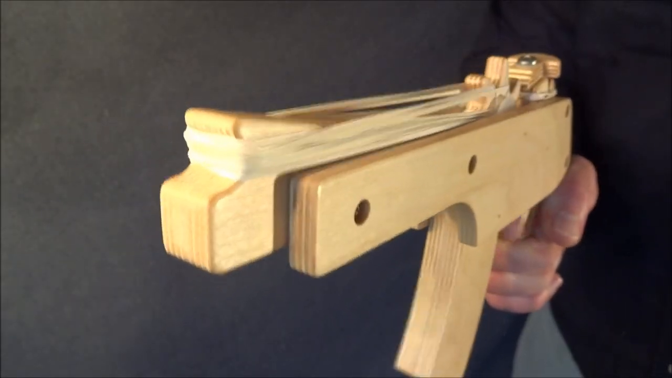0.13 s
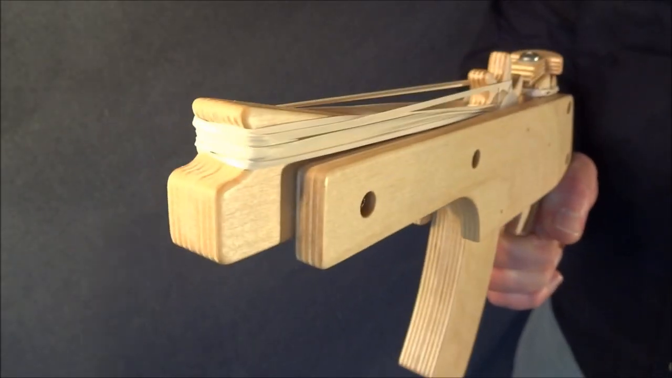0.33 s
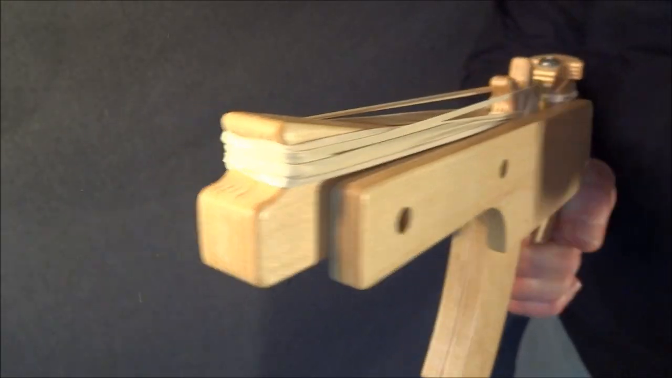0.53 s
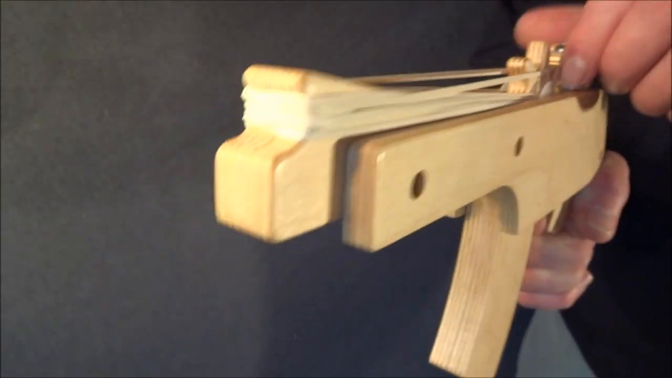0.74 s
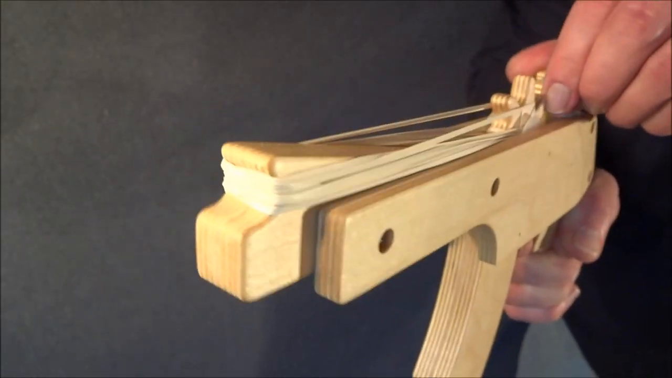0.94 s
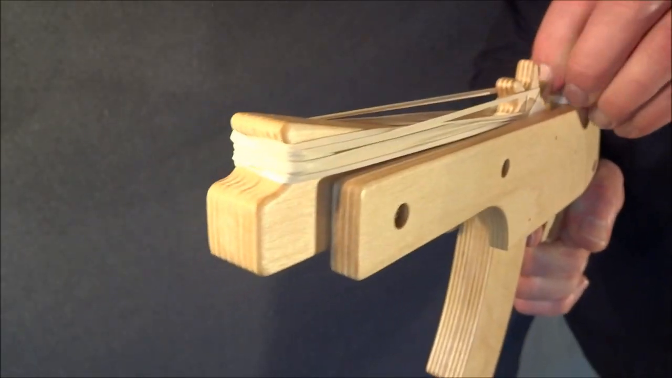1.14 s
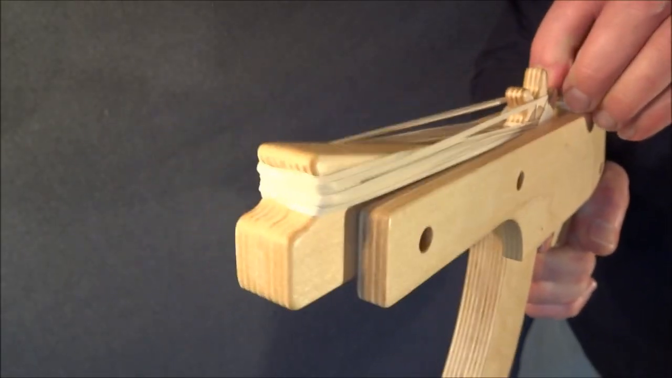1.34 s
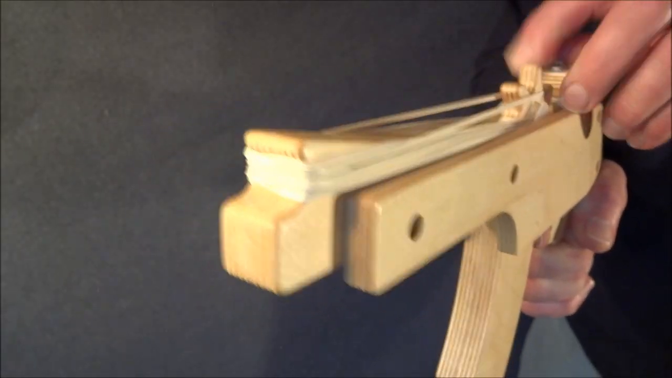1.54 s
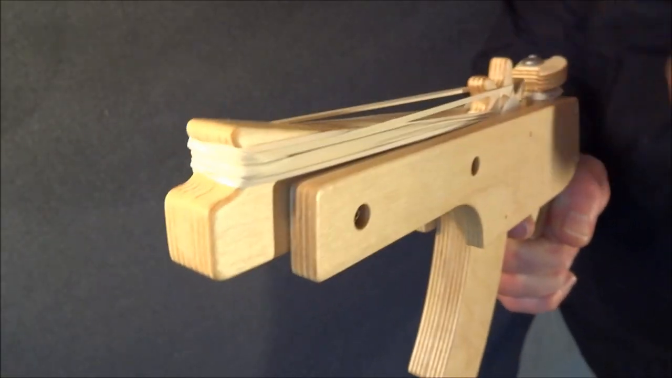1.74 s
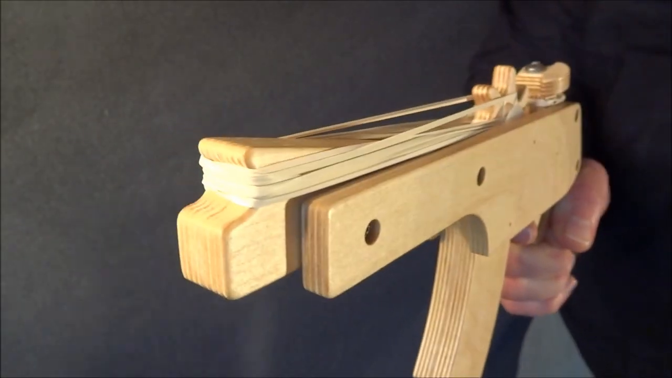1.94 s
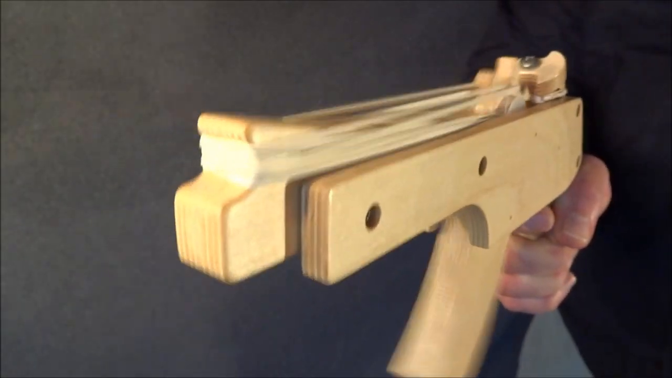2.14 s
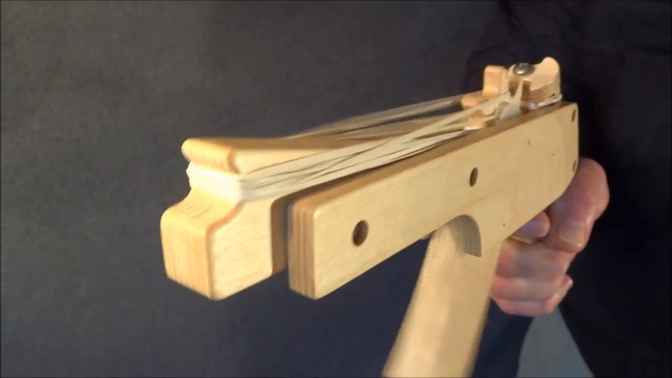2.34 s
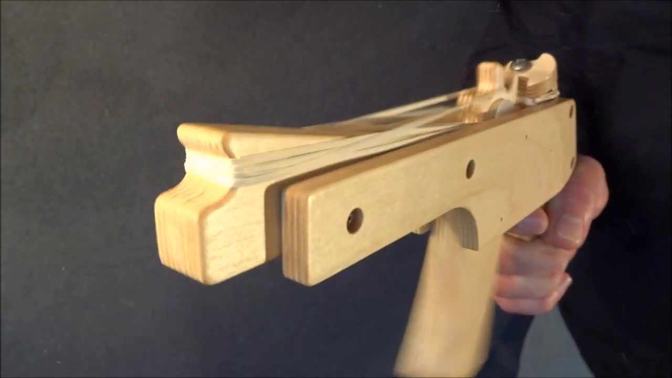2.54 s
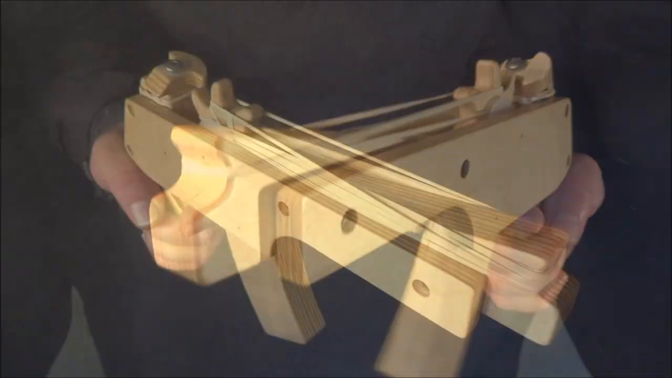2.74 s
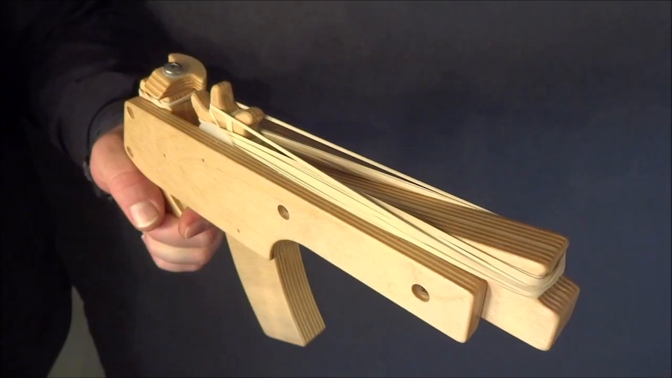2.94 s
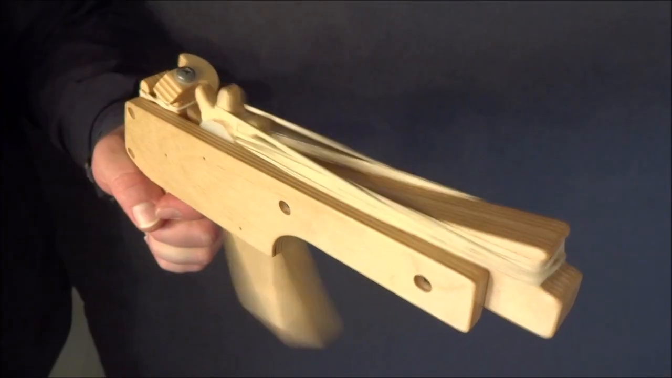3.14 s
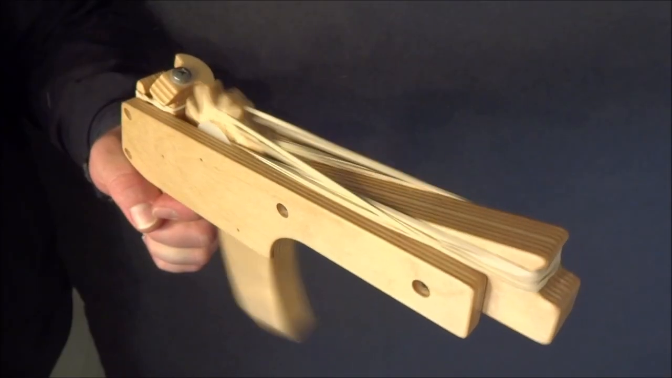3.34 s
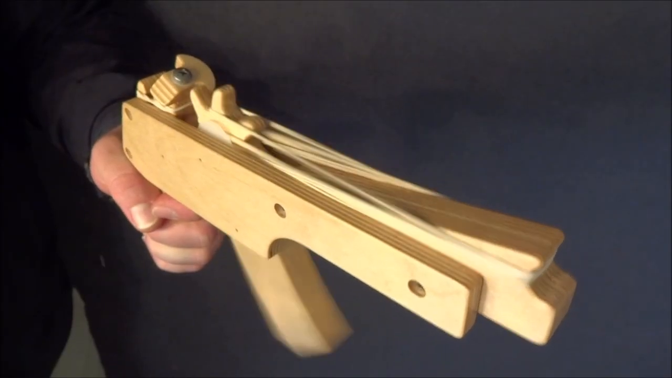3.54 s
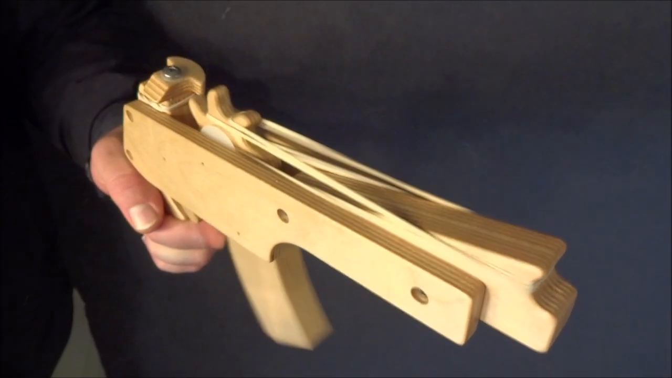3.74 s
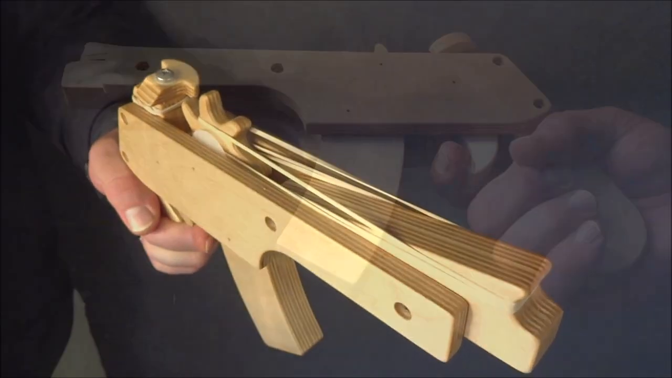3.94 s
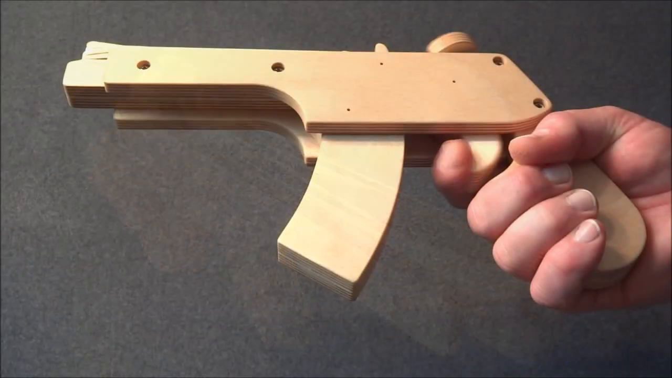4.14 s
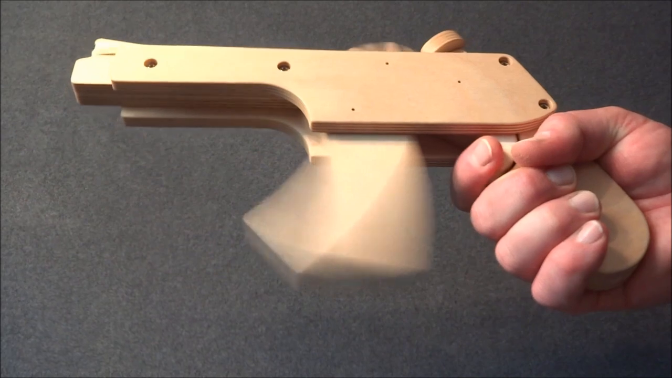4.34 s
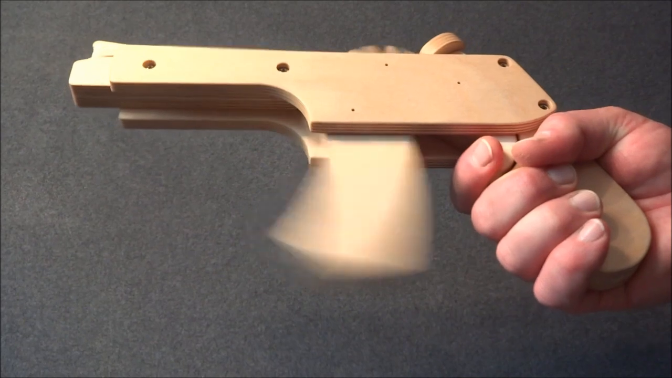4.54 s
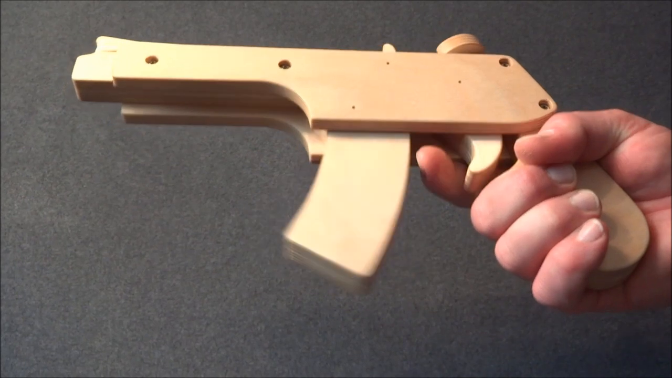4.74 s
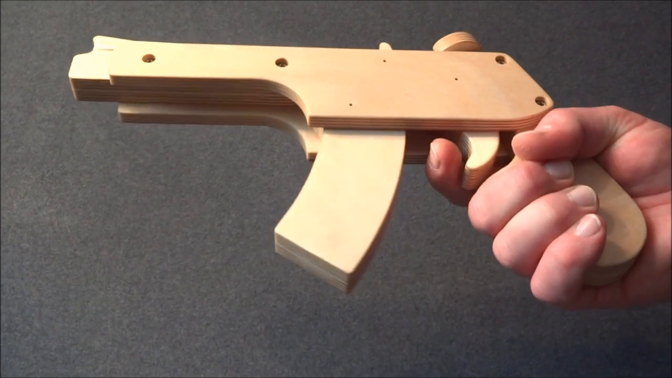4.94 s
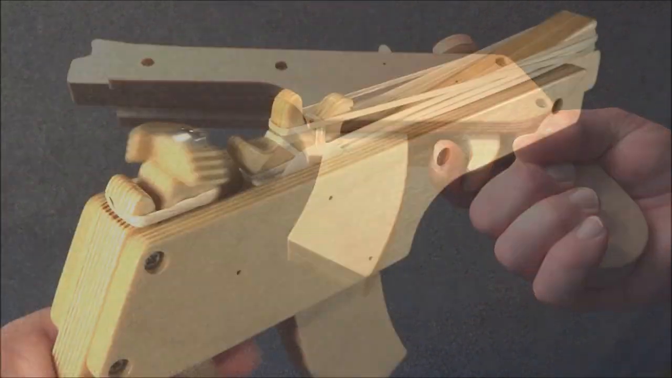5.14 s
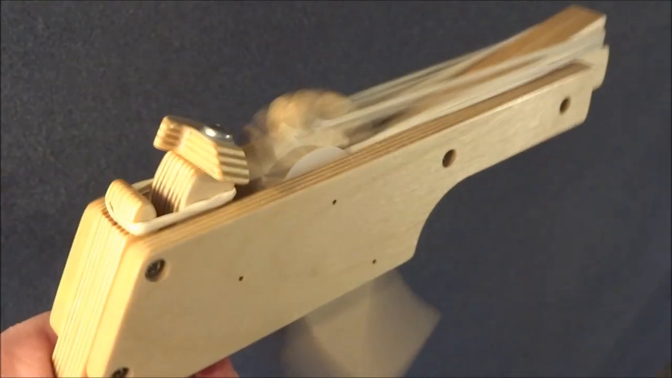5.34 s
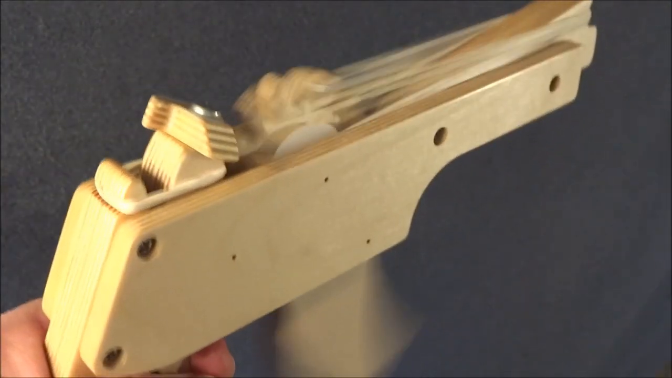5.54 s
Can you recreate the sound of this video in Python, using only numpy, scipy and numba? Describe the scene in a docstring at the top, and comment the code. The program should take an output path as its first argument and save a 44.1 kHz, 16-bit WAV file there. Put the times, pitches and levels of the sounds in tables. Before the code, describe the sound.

A wooden rubber band gun fires one snapping shot, then four rapid rattling bursts of wooden clicks in an echoing room.

```python
"""Plywood rubber band guns fire in an echoing room. Over a low hum, a faint hiss of room echo dies away
as a trigger clicks and one shot fires: the band wheel snaps, the escapement (the rocking catch that frees
the wheel) clacks, and the band lands nearby. Fingers click, rub and squeak on the fire selector. From
about 2 s come four rattling bursts, each slowing as the bands run out and pull less on the wheel. The
background switches abruptly before each of the last three. Throughout, a slow gain control and a fast
limiter flatten the hits, so the room sounds louder between them."""
import sys
import numpy as np
from scipy import signal
from scipy.fft import rfft, irfft, next_fast_len
from scipy.io import wavfile
from scipy.ndimage import uniform_filter1d, minimum_filter1d
from numba import njit

SR = 44100
rng = np.random.default_rng(int(sys.argv[2]) if len(sys.argv) > 2 else 0)


def pcm_store(signal):
    """Save signal as 16-bit PCM."""
    levels = np.round(np.clip(np.atleast_2d(signal), -1, 1) * 32767)
    wavfile.write(sys.argv[1], SR, levels.astype(np.int16).T)


N = 246959
TIME = np.arange(N) / SR
HIT_T = np.arange(SR // 10) / SR   # time within one hit [s]


def from_db(db):
    """Turn decibels into a factor to multiply by."""
    return np.exp(np.asarray(db) * (np.log(10) / 20))


def rms_one(x):
    """Scale a sound to an average strength (rms) of 1."""
    return x / np.sqrt(np.mean(x ** 2) + 1e-20)


def at_hz(points, hz):
    """Read between the rows of a table on a log-frequency axis."""
    f, v = np.transpose(points)
    return np.interp(np.log(hz + 1e-3), np.log(f), v)


def bins_hz(x):
    """The frequencies in a sound's spectrum."""
    return np.arange(x.shape[-1] // 2 + 1) * SR / x.shape[-1]


def colour(x, db):
    """Turn each frequency up or down."""
    return irfft(rfft(x) * from_db(db), x.shape[-1])


def low_cut(x, hz):
    """Thin out the bass with two gentle filters."""
    r = np.exp(-2 * np.pi * hz / SR)
    return signal.lfilter([r, -2 * r, r], [1, -2 * r, r * r], x)


def band_noise(hz, octaves, size):
    """Noise gathered around one pitch; fewer octaves make it more like a tone."""
    white = rng.standard_normal(size)
    away = np.log2((bins_hz(white) + 1) / hz) / octaves
    return rms_one(colour(white, -20 * np.log10(1 + away ** 2 + away ** 4 / 2)))


def dying(t60, rise_s=0.0004):
    """A hit rises quickly, then drops 60 dB in t60 seconds: its fade time."""
    return (1 - np.exp(-HIT_T / rise_s)) * from_db(-60 * HIT_T / max(t60, 1e-3))


def add(track, s, sound):
    """Mix a sound in at s seconds."""
    i = max(round(s * SR), 0)
    track[i:i + len(sound)] += sound[:max(N - i, 0)]


# how alike the two ears hear the room: (frequency [Hz], likeness [0 to 1])
EAR_LIKENESS = [(50, 0.91), (250, 0.77), (1000, 0.69), (2500, 0.87), (5000, 0.69), (11000, 0.7)]
def stereo_noise(spectrum, size):
    """Noise with a given spectrum, partly alike in both ears."""
    mid, side = rng.standard_normal((2, size))
    hz = bins_hz(mid)
    alike = np.clip(at_hz(EAR_LIKENESS, hz), 0, 1)
    both = np.sqrt(1 + alike) * rfft(mid) + np.sqrt(1 - alike) * rfft(side) * [[1], [-1]]
    return rms_one(irfft(both * from_db(at_hz(spectrum, hz)), size))


# the hush of the room and the noise of hands: (frequency [Hz], relative level [dB])
ROOM_TONE = [(30, -9), (120, -5.5), (200, -5.5), (500, -6), (800, -11), (2000, -15), (5000, -23),
             (10500, -30.5), (12000, -64.5)]
HAND_NOISE = [(30, -11), (130, 0), (250, -5.5), (450, 2), (800, -2.5), (2000, -8.5), (3200, -8.5),
              (7000, -18.5), (11000, -26)]
# the tones of the hum: (frequency [Hz], level before the passage's gain [dB])
HUM_TONES = [(39, -62.5), (116, -64.5)]
# stretches of steady background: (start [s], room tone [dB], hand noise [dB], hum gain [dB])
PASSAGES = [(0, -60, -91, -1), (2.975, -53.5, -54.5, -13), (4.042, -65, -51, -23),
            (5.111, -57, -51.5, -7.5)]
def background(size):
    """Room tone, hand noise and hum jump to new levels with each passage."""
    air = stereo_noise(ROOM_TONE, size)[:, :N]
    hands = stereo_noise(HAND_NOISE, size)[:, :N]
    hum = sum(from_db(db) * np.sqrt(2) * np.sin(2 * np.pi * hz * TIME) for hz, db in HUM_TONES)
    out = np.zeros((2, N))
    for start, air_db, hands_db, hum_db in PASSAGES:
        mix = from_db(air_db) * air + from_db(hands_db) * hands + from_db(hum_db) * hum
        i = round(start * SR)
        out[:, i:] = mix[:, i:]
    return out


def passage_spans():
    """The start and end of each passage, in seconds."""
    starts = [row[0] for row in PASSAGES] + [N / SR]
    return list(zip(starts, starts[1:]))


# first a faint room echo dying away, then three finger rubs on the wood:
# (loudest moment [s], level [dB], time to swell and to ebb [s])
SOFT_HISSES = [(.05, -47, .12), (.58, -68.5, 0.092), (.81, -57.5, .07), (1.17, -62, .03)]
# a fingertip squeaks on the selector: (time [s], level [dB])
SELECTOR_SQUEAK = [(1.03, -81.5), (1.1, -66), (1.18, -63), (1.22, -81)]
def hiss_and_squeak(size):
    """A broad hiss makes the opening echo and the later rubs; a fingertip squeaks at one pitch."""
    hiss = sum(from_db(db) * np.exp(-np.abs(TIME - s) / fade_s) for s, db, fade_s in SOFT_HISSES)
    squeak = from_db(np.interp(TIME, *np.transpose(SELECTOR_SQUEAK), left=-120, right=-120))
    return hiss * band_noise(3100, .9, size)[:N] + squeak * band_noise(3950, 0.074, size)[:N]


# clicks of trigger and selector:
# (time [s], level [dB], pitch [Hz], fade time [s], share sent to the room [dB], thump share [dB])
TRIGGER_CLICKS = [(0.0396, -10.5, 1690, .013, -4, -40), (.398, -35, 1100, 0.016, -21, -18),
                  (.526, -43, 3300, 0.036, 6.5, -13), (.754, -36.5, 3900, .014, -14, -15),
                  (.805, -32, 4970, 0.037, 5, -19), (.876, -31.5, 2370, 0.04, 2, -6),
                  (.899, -28, 2380, .01, -20, -13), (.938, -36, 3100, 0.074, -6.5, -9),
                  (1.3, -40, 1650, .019, -10, -22), (1.586, -48.5, 3200, 0.018, -2, -16),
                  (1.631, -40.5, 1790, .017, -6, -16), (3.906, -18, 3980, 0.02, -8, -14.5),
                  (4.122, -50, 5030, .09, 6, -14), (4.2569, -13, 2280, 0.018, 5, -34),
                  (4.998, -16, 3400, 0.016, -2, -15), (5.2343, -8, 2310, .011, -12, -38)]
def trigger_clicks(start, end):
    """Each click also thumps the stock. Gives the direct sound and the share that fills the room."""
    direct, sent = np.zeros((2, N))
    size, rise_s = len(HIT_T), 0.00056
    for s, db, hz, t60, room_db, thump_db in TRIGGER_CLICKS:
        if start <= s < end:
            click = low_cut(band_noise(hz, 1.1, size) * dying(t60, rise_s), hz / 5)
            thump = from_db(thump_db) * band_noise(450, 1.8, size) * dying(0.045, rise_s)
            add(direct, s, from_db(db) * (click + thump))
            add(sent, s, from_db(db + room_db) * (click + thump))
    return direct, sent


# the tone of the echoes: (frequency [Hz], relative level [dB])
ECHO_COLOUR = [(100, -15.5), (600, 0), (1200, 8), (2200, 7.5), (3200, 0.5), (4500, 2.5), (6000, -3),
               (8000, 1), (11000, 3)]
# how long the room rings: (frequency [Hz], fade time [s])
ECHO_FADE = [(100, 0.24), (700, 0.69), (1500, 0.32), (3000, 0.34), (6000, 0.35), (11000, 0.28)]
def echoes(x, wet_db=-3.0, gap_s=0.0035, build_s=0.0027):
    """Echoes swell after a short gap and fade. Each source has its own place, so its own pattern."""
    t = np.arange(SR * 3 // 4) / SR
    noise = rfft(stereo_noise(ECHO_COLOUR, len(t)))
    hz, centres = bins_hz(t), np.log([f for f, _ in ECHO_FADE])
    tail = np.zeros((2, len(t)))
    for share, (_, t60) in zip(np.eye(len(centres)), ECHO_FADE):
        band = irfft(noise * np.interp(np.log(hz + 1), centres, share), len(t))
        tail += band * from_db(-60 * t / t60)
    tail *= np.clip((t - gap_s) / build_s, 0, 1)
    room = from_db(wet_db) * tail / np.sqrt(np.sum(tail ** 2) / 2)
    return signal.fftconvolve(x[None], room, axes=1)[:, :len(x)]


def ring(tones, tilt_db=0, spread_db=1.5, detune=.011, rise_s=0.0004):
    """Struck wood rings at its own tones, a little differently each time; tilt_db brightens it."""
    hz, db, t60 = np.transpose(tones)
    t = HIT_T[:len(HIT_T) // 2]
    strength, shift, sign = rng.standard_normal((3, len(hz)))
    gain = np.sign(sign) * from_db(db + spread_db * strength + tilt_db * np.log2(hz / 4000))
    phase = 2 * np.pi * np.outer(hz * (1 + detune * shift), t)
    fades = from_db(-60 * t / t60[:, None])
    rings = gain @ (np.cos(phase) * fades) * (1 - np.exp(-t / rise_s))
    # the wood gives off little sound below its lowest tone
    return low_cut(np.pad(rings, (0, len(HIT_T) - len(t))), hz.min() / 3)


# the crack of two parts meeting: (frequency [Hz], relative level [dB])
CONTACT_CRACK = [(50, -50.5), (400, -25), (800, -24), (1500, -5), (3000, -0.5), (5000, -2.5), (6500, -1),
                 (8000, -8.5), (11000, -10.5), (12500, -45)]
def strike(tones, tilt_db, crack_db, crack_t60):
    """A hard hit makes ringing tones and a brief crack of noise."""
    hz = bins_hz(HIT_T)
    slope_db = tilt_db * np.log2(np.maximum(hz, 1500) / 4000)
    noise = colour(rng.standard_normal(len(HIT_T)), at_hz(CONTACT_CRACK, hz) + slope_db)
    crack = low_cut(rms_one(noise) * dying(crack_t60), 300)
    return ring(tones, tilt_db) + from_db(crack_db) * crack


def blows(times, level_db, change_db, first_bounce_s=.0075):
    """Time, level and bounce delay of each hit: force drifts and bounces come sooner, with some chance."""
    shot = np.arange(len(times))
    scatter_db, jitter = rng.standard_normal((len(times), 2)).T
    delays = first_bounce_s * np.exp(.13 * jitter - .05 * shot)
    return zip(times, level_db + change_db * shot + scatter_db, delays)


# the tones of frame, stock, wheel catch and wheel: (frequency [Hz], level [dB], fade time [s])
FRAME_TONES = [(2129, -8.5, 0.027), (2306, -10, .025)]
STOCK_TONES = [(85, -19, .03), (170, -10.5, 0.02), (336, -3, 0.011), (642, 0, 0.013)]
CATCH_TONES = [(1625, -13.5, 0.0079), (2510, -8, 0.016), (2800, -7.5, 0.021), (3504, -5, .012),
               (4080, -8, 0.0034), (5050, -18.5, 0.0035), (6650, -20, 0.0064), (8800, -12, .008),
               (10860, -12.5, 0.0088)]
WHEEL_TONES = [(5687, -3.5, .017), (6024, 0, 0.02), (6343, -8, .016)]
def wheel_snaps(times, level_db, change_db, accent_db, wheel_db, frame_db, frame_change_db, knock_db):
    """The wheel hits its catch and bounces once; wheel and frame ring, and the stock knocks."""
    out, bounce_db = np.zeros(N), -5.5
    for shot, (s, db, delay) in enumerate(blows(times, level_db, change_db)):
        force = from_db(db + accent_db * (shot == 0))
        frame = from_db(frame_db + frame_change_db * shot) * ring(FRAME_TONES)
        knock = from_db(knock_db) * ring(STOCK_TONES)
        add(out, s, force * (frame + knock))
        for lag, drop_db in ((0, 0), (delay, bounce_db)):
            catch = strike(CATCH_TONES, tilt_db=0, crack_db=-.5, crack_t60=0.017)
            wheel = from_db(wheel_db) * ring(WHEEL_TONES)
            add(out, s + lag, force * from_db(drop_db) * (catch + wheel))
    return out


# the tones of the escapement: (frequency [Hz], level [dB], fade time [s])
ESCAPEMENT_TONES = [(1680, -9, 0.0067), (2231, -11, 0.017), (2880, 1.5, 0.0084), (3113, 1.5, 0.013),
                    (3600, -6, 0.011), (4008, -2.5, 0.0098), (5260, -9, 0.019), (7040, -14.5, 0.0051)]
def escapement_clacks(times, level_db, change_db, tilt_db, bounce_db=-5, settle_s=.022, settle_db=-13):
    """The escapement swings into its stop and bounces; after the last shot it touches once more."""
    out, contacts = np.zeros(N), []
    for s, db, delay in blows(times, level_db, change_db):
        contacts += [(s, db), (s + delay, db + bounce_db)]
    contacts.append((times[-1] + settle_s, level_db + settle_db))
    for s, db in contacts:
        add(out, s, from_db(db) * strike(ESCAPEMENT_TONES, tilt_db, crack_db=-3.5, crack_t60=0.011))
    return out


def shot_times(start, shots, period, slowing, drag, head_start):
    """When snaps and clacks fall: a quick first shot, steady slowing, and a drag on the last bands."""
    shot = np.arange(shots)
    hurry = head_start * np.exp(-shot / .646)
    lag = drag * np.exp((shot - shot[-1]) / 1.723)
    periods = period + slowing * shot - hurry + lag
    snaps = start + np.cumsum(periods) - periods
    swing_share = np.where(shot == 0, .448, .575)   # the escapement arrives sooner from rest
    return snaps, snaps + periods * swing_share


# the pace of the single shot and the four bursts: (start [s], shots [count], time per shot [s],
# slowing per shot [s], drag on the last shot [s], time saved on the first [s])
BURST_PACE = [(0.0524, 1, .254, 0, 0, 0), (2.0973, 14, .05759, .00074, .047, .0111),
              (3.1199, 13, .03931, .00204, .0014, .0006), (4.265, 10, .04578, .00121, .0019, .0101),
              (5.2422, 8, .04234, .00179, .0017, .0049)]
# how hard each one snaps: (level [dB], change per shot [dB], extra on the first shot [dB],
# wheel ring [dB], frame ring [dB], frame change per shot [dB], stock knock [dB])
SNAP_FORCE = [(3.5, 0, 0, 6, 7, 0, -25.5), (-.5, .2, -1.5, 1.5, 4.5, -1, -22),
              (4, 0.04, 4, -2, 7.5, -1.15, -25.5), (5, -0.14, 5.5, 3.5, 7, 0, -20.5),
              (6.5, 0.38, 7, 1, 7, -0.2, -22.5)]
# how hard each one clacks: (level [dB], change per shot [dB], brightness [dB per octave])
CLACK_FORCE = [(4, 0, -1.5), (1, -0.28, -2), (5, -0.14, .3), (7, 0.4, .7), (11.5, -0.5, 1.2)]
def gun(start, end):
    """Wheel and escapement take turns: a snap and a clack for every shot in one passage."""
    snaps, clacks = np.zeros((2, N))
    for pace, snap_force, clack_force in zip(BURST_PACE, SNAP_FORCE, CLACK_FORCE):
        if start <= pace[0] < end:
            snap_times, clack_times = shot_times(*pace)
            snaps += wheel_snaps(snap_times, *snap_force)
            clacks += escapement_clacks(clack_times, *clack_force)
    return snaps, clacks


# the first band lands and bounces: (time [s], level [dB])
BAND_LANDINGS = [(0.2662, -26), (0.268, -13), (0.2717, -12.5)]
def band_landing():
    """A rubber band slaps down close by: a dull thud with some bass and a thin crack."""
    out, size = np.zeros(N), len(HIT_T)
    for s, db in BAND_LANDINGS:
        thud = band_noise(800, 0.84, size) * dying(0.017)
        bass = from_db(-5.5) * band_noise(160, 1.3, size) * dying(0.018)
        slap = band_noise(4000, 1.34, size) * dying(0.005)
        add(out, s, from_db(db) * (thud + bass + slap))
    return out


def scene():
    """Mix all the sounds; the echoes of gun and clicks stop where a passage ends."""
    size = next_fast_len(N)
    out = background(size)
    band = band_landing()
    out += hiss_and_squeak(size)
    out += band * from_db([[1.5], [-1.5]]) + from_db(-16.5) * echoes(band)   # a little to the left
    for start, end in passage_spans():
        part = slice(round(start * SR), round(end * SR))
        snaps, clacks = (x[part] for x in gun(start, end))
        clicks, clicks_sent = (x[part] for x in trigger_clicks(start, end))
        out[:, part] += snaps + clacks + clicks + echoes(snaps) + echoes(clacks + clicks_sent)
    return out * from_db([[.15], [-.15]])


@njit
def follow_excess(excess_db, attack, release):
    """The volume cut chases how far the sound is too loud, with one speed up and another down."""
    out, now = np.zeros(len(excess_db)), 0.0
    for i in range(len(excess_db)):
        now += (excess_db[i] - now) * (attack if excess_db[i] > now else release)
        out[i] = now
    return out


def gain_control(x, threshold_db, attack_s, release_s):
    """The volume sinks during a burst and recovers slowly; it starts afresh in each passage."""
    power = uniform_filter1d(np.mean(x ** 2, axis=0), size=441)
    excess_db = np.maximum(10 * np.log10(np.abs(power) + 1e-12) - threshold_db, 0)
    parts = np.split(excess_db, [round(end * SR) for _, end in passage_spans()[:-1]])
    cuts_db = [follow_excess(part, 1 / (attack_s * SR), 1 / (release_s * SR)) for part in parts]
    return x * from_db(-np.concatenate(cuts_db))


def limiter(x, ceiling_db, ahead_s, release_s):
    """Holds peaks down. It looks ahead, so the room dips just before each hit and swells back after."""
    excess_db = np.maximum(20 * np.log10(np.abs(x).max(axis=0) + 1e-9) - ceiling_db, 0)
    held_db = -minimum_filter1d(-excess_db, size=130)
    cut_db = uniform_filter1d(follow_excess(held_db, 1.0, 1 / (release_s * SR)), size=30)
    return x * from_db(-np.interp(TIME + ahead_s, TIME, cut_db))


# the volume drops as the first burst starts, then swells: (time [s], gain [dB])
VOLUME_SWELL = [(2.09, 2.5), (2.096, -6.5), (2.2, -3), (2.55, -0.44)]
def record(dry):
    """Even out the loudness, shape the swell and cut off the highest treble."""
    levelled = gain_control(dry, threshold_db=-16.0, attack_s=0.38, release_s=5.9)
    limited = limiter(levelled, ceiling_db=-4.5, ahead_s=0.0009, release_s=0.0074)
    swell = from_db(np.interp(TIME, *np.transpose(VOLUME_SWELL)))
    treble_cut = signal.ellip(10, .3, 80, 11050, fs=SR, output="sos")
    return signal.sosfilt(treble_cut, limited * swell)


dry = scene()
out = record(dry)
pcm_store(out)
```